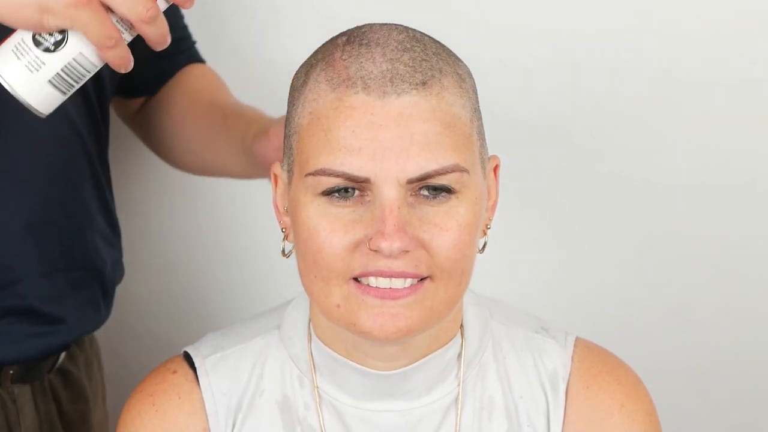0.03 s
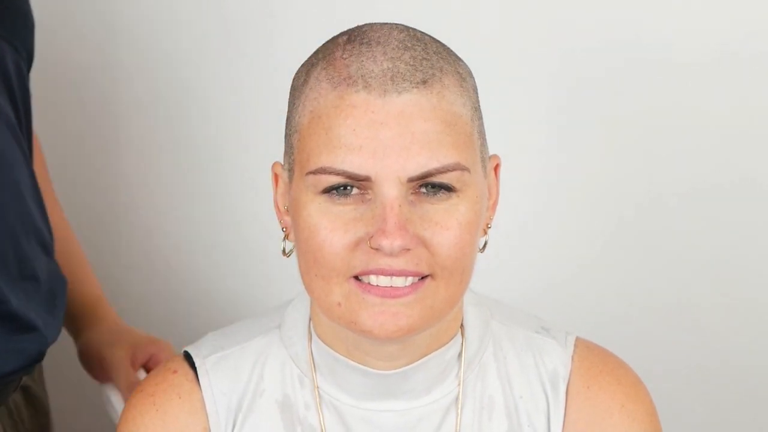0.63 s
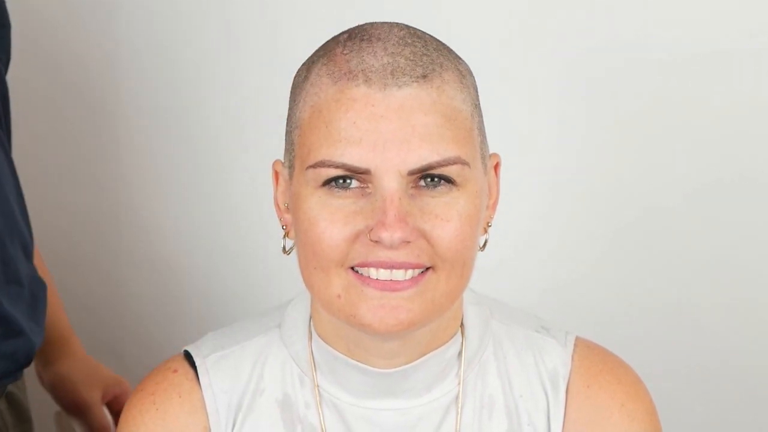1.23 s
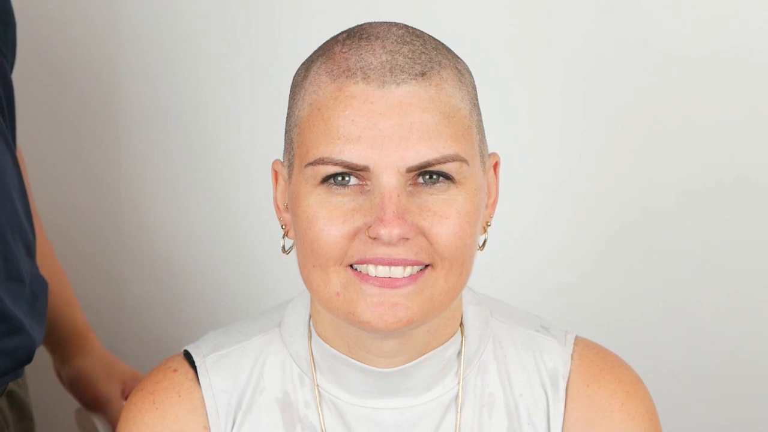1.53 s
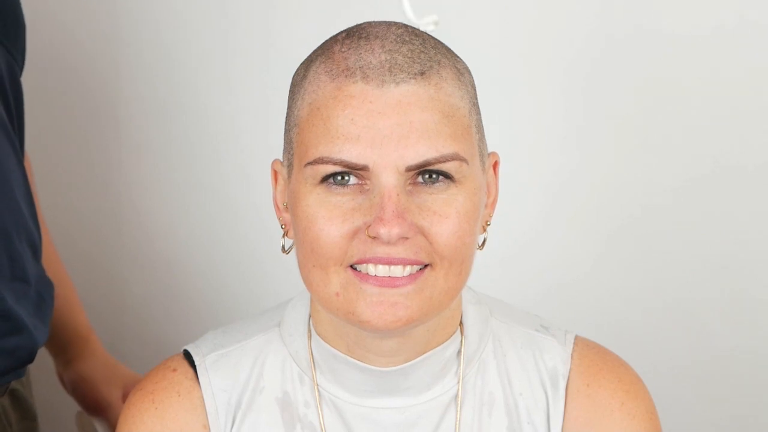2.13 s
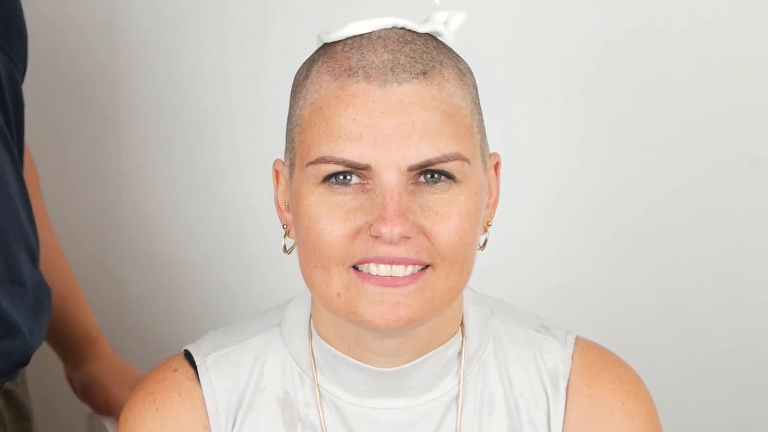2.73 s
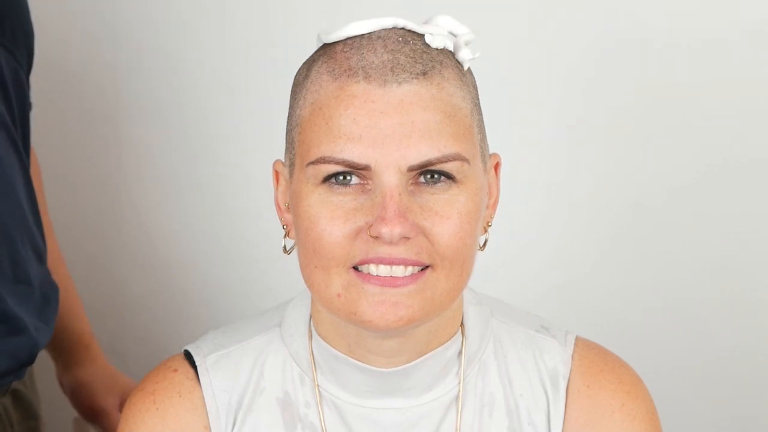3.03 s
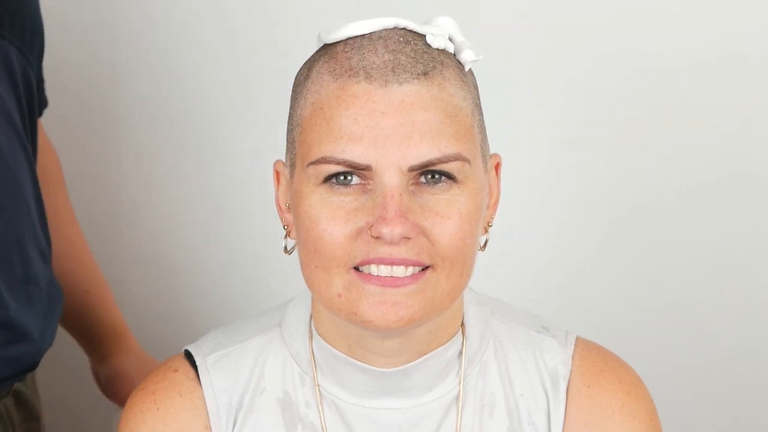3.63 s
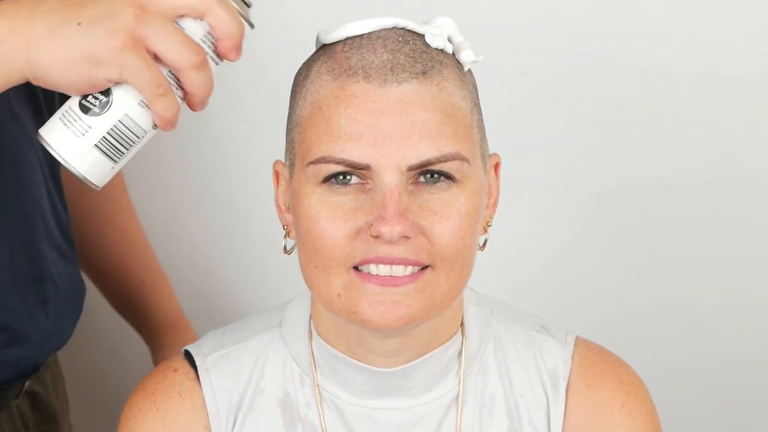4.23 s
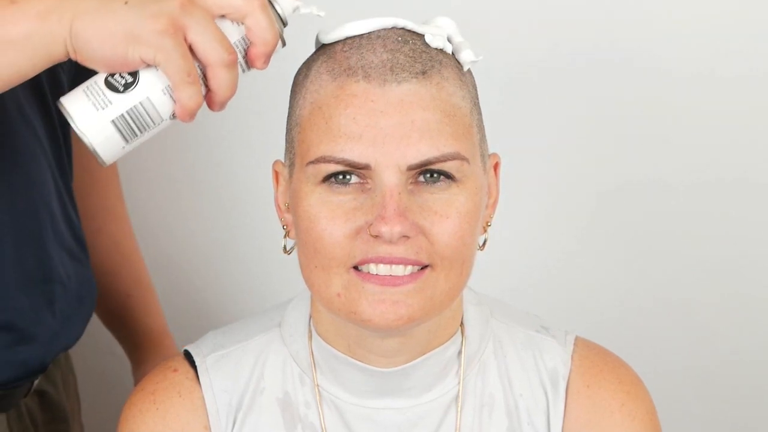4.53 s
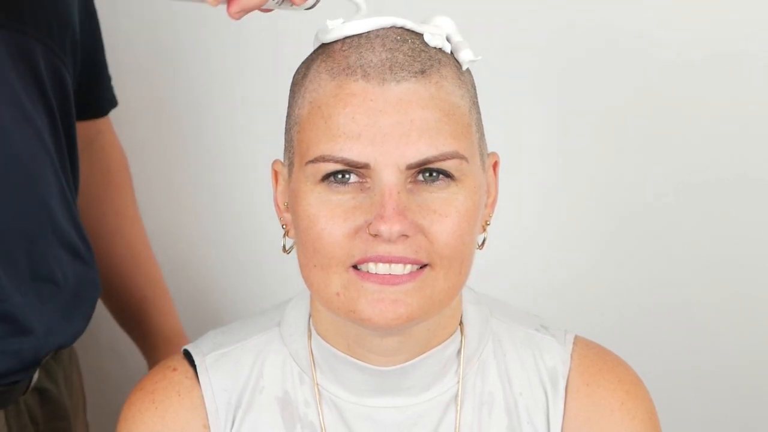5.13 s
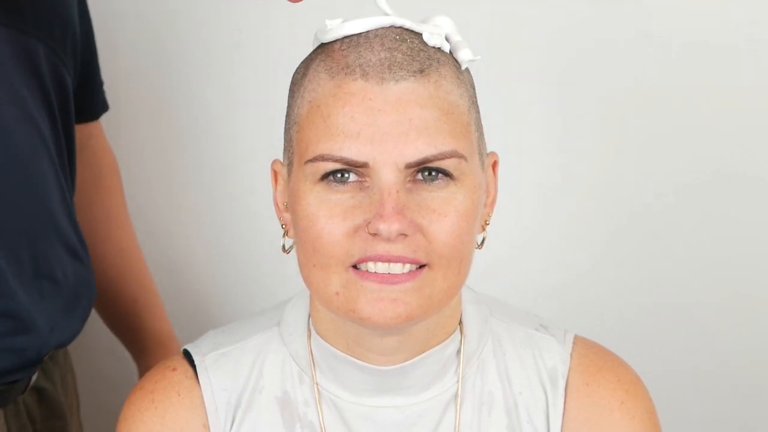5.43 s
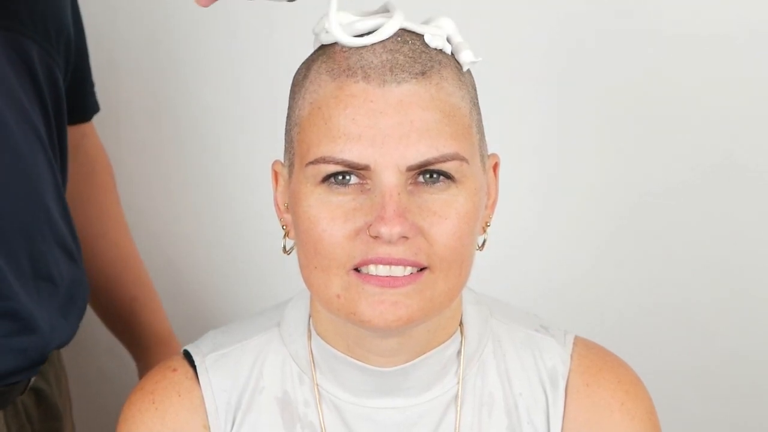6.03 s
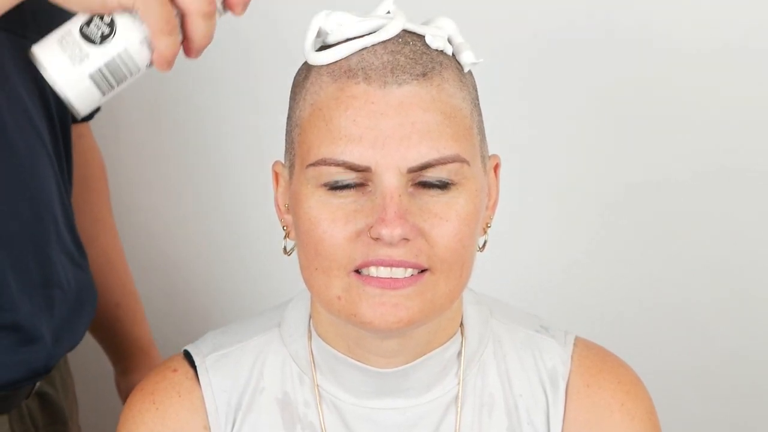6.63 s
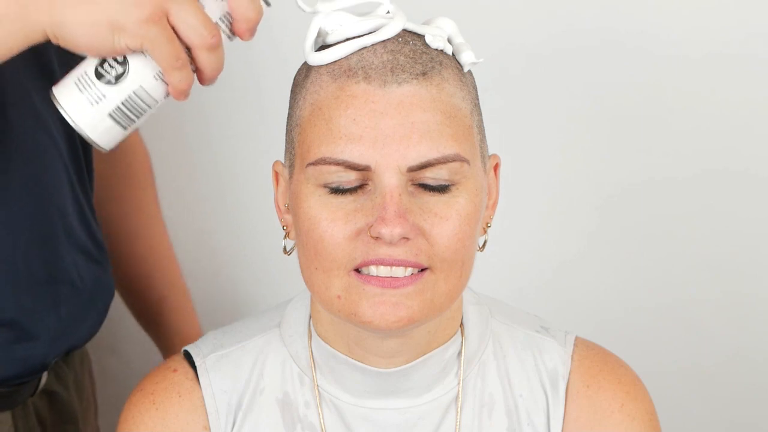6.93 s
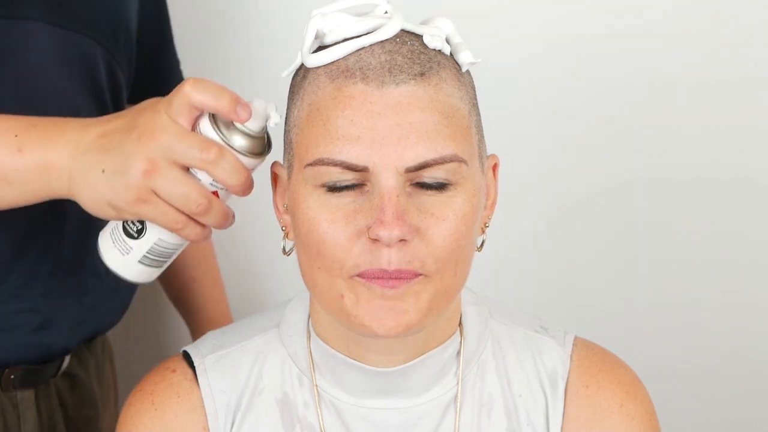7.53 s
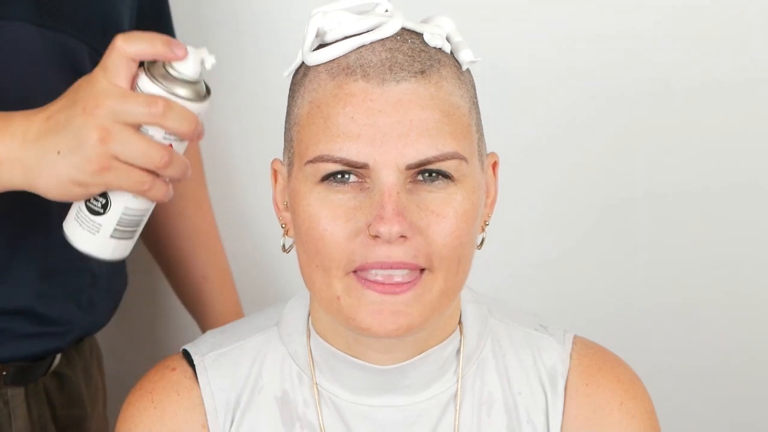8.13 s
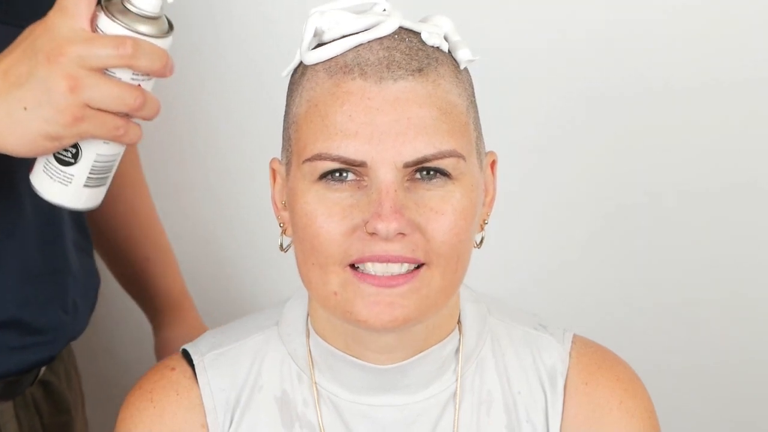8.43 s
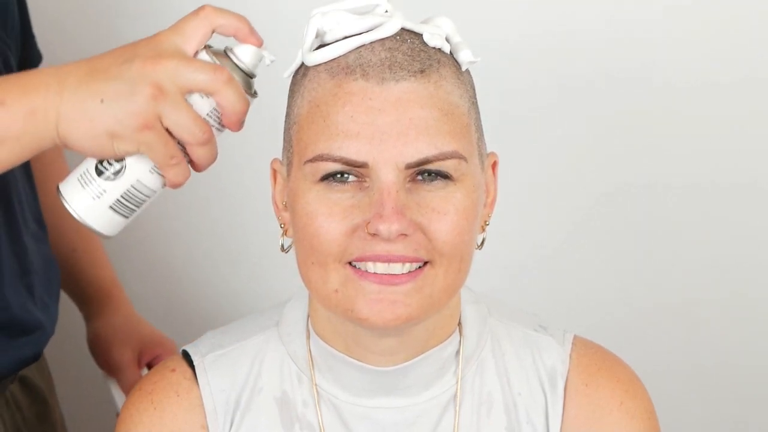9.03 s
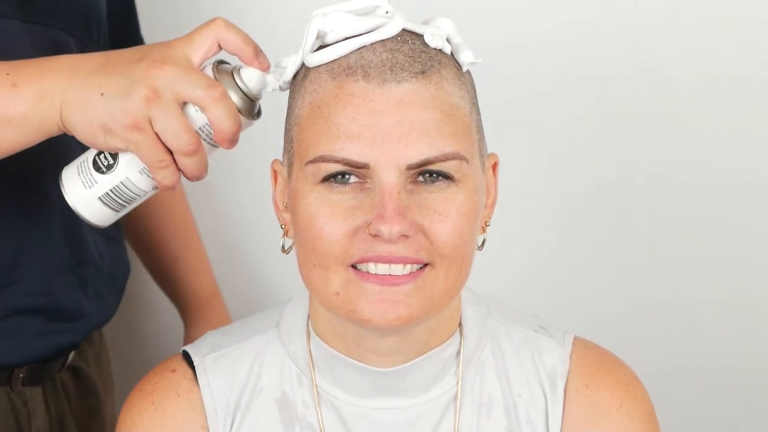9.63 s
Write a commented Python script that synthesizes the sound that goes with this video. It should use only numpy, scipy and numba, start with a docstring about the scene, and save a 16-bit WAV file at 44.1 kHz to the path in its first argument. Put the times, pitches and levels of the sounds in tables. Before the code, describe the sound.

An aerosol can squirts shaving foam three times close by, hissing and crackling with wet spurts in a quiet room.

```python
"""An aerosol can squirts shaving foam three times, close by in a small quiet room.
Gas hisses through the nozzle, gas pockets crackle and pop in the foam, and the first two presses
end in a loud wet spurt. Between presses a hand rubs the can, fingers tick on the cap and damp skin
squeaks once. A faint tone and a low hum come and go over the room's rumble."""
import sys
import numpy as np
from scipy import signal
from scipy.fft import rfft, irfft
from scipy.io import wavfile
from scipy.ndimage import uniform_filter1d
from numba import njit

SR = 44100
rng = np.random.default_rng(int(sys.argv[2]) if len(sys.argv) > 2 else 0)


def to_wav(sig):
    """Store sig (one row per channel, or 1-D mono) as 16-bit WAV at the path in sys.argv[1].

    Samples outside -1..1 are clipped; the rate is SR.
    """
    pcm = np.clip(np.atleast_2d(sig), -1, 1) * 32767
    pcm = np.round(pcm).astype(np.int16)
    wavfile.write(sys.argv[1], SR, pcm.T)  # frames by channels


N = 435708
TIME = np.arange(N) / SR


def undb(db):
    """Turn decibels into a number to multiply by."""
    return np.exp(np.asarray(db) * np.log(10) / 20)


def unit(x):
    """Scale a sound to an average (rms) level of 1."""
    return x / np.sqrt(np.mean(x ** 2) + 1e-20)


def steady(x):
    """Even out a sound so that its level stays near 1 over every 40 ms."""
    return x / np.sqrt(np.abs(uniform_filter1d(x ** 2, size=1800)) + 1e-12)


def drift(rate):
    """A smooth random wiggle of size about 1 that changes course `rate` times a second."""
    step = max(int(SR / rate), 1)
    stairs = np.repeat(rng.standard_normal(N // step + 1), step)
    return unit(uniform_filter1d(stairs, step)[:N])


def envelope(s, hold_s, rise_s, fade_s):
    """Samples and gains of a sound that is full from s for hold_s; rise and fade each cover 60 dB."""
    span = slice(max(int((s - rise_s) * SR), 0), int((s + hold_s + fade_s) * SR))
    away = np.maximum((s - TIME[span]) / rise_s, (TIME[span] - s - hold_s) / fade_s)
    return span, undb(-60 * np.maximum(away, 0))


def curves(table):
    """Join the points of each dB column into a gain over time, silent outside the table."""
    s, *columns = np.transpose(table)
    span = slice(max(int(s[0] * SR), 0), int(s[-1] * SR))
    gains = np.zeros((len(columns), N))
    gains[:, span] = undb([np.interp(TIME[span], s, column) for column in columns])
    gains[0] = uniform_filter1d(gains[0], size=90)  # no click at the ends
    return gains


def add(out, s, sound):
    """Mix a short sound in at s seconds."""
    i = max(int(s * SR), 0)
    out[i:i + len(sound)] += sound[:N - i]


def colour(x, points, size=2048):
    """Shape bass and treble to follow (f/Hz, level/dB) points."""
    hz, db = np.transpose(points)
    grid = np.maximum(np.fft.rfftfreq(size, 1 / SR), 1)
    gains = undb(np.interp(np.log(grid), np.log(hz), db))
    # folding the cepstrum makes the filter ring only after a sound, never before
    cepstrum = irfft(np.log(gains))
    cepstrum[1:size // 2] *= 2
    cepstrum[size // 2 + 1:] = 0
    response = irfft(np.exp(rfft(cepstrum)))
    return signal.oaconvolve(np.float32(x), np.float32(response))[:len(x)].astype(float)


def band(x, hz, octaves, order=2):
    """Keep only the pitches around hz."""
    edges = np.clip(hz * 2 ** (np.array([-.5, .5]) * octaves), [10, 20], [SR * .4, SR * .47])
    return signal.sosfilt(signal.butter(order, edges, "band", fs=SR, output="sos"), x + 1e-18)


@njit
def resonance(x, hz, width):
    """Ring like a hollow space whose pitch can move; width is a share of that pitch."""
    out, band_state, low_state = np.empty(len(x)), 0., 0.
    for i in range(len(x)):
        g = np.tan(np.pi * hz[i] / SR)
        ring = (band_state + g * (x[i] - low_state)) / (1 + g * (g + width))
        band_state = 2 * ring - band_state
        low_state += 2 * g * ring
        out[i] = width * ring
    return out


# the room's background noise: f/Hz, level/dB
RUMBLE_COLOUR = [(15, -91), (25, -58), (59, -32), (77, -20), (144, -7.5), (253, -4), (421, -6), (457, -6.5),
                 (552, -9), (826, -12), (1200, -15), (1300, -15.5), (4150, -24.5), (6550, -28),
                 (15500, -30)]
# its stereo width, as side level against middle level: f/Hz, level/dB
RUMBLE_WIDTH = [(50, -11), (130, -3.5), (300, -2.5), (1000, -3), (4000, -1.5), (12000, -0.5)]

def room_rumble(db=-64.5):
    """The room's steady rumble and faint hiss."""
    mid, side = (unit(colour(rng.standard_normal(N), RUMBLE_COLOUR, size=8192)) for _ in range(2))
    side = colour(side, RUMBLE_WIDTH)
    return undb(db + 0.14 * drift(5.3)) * np.array([mid + side, mid - side])


# strokes of hand and sleeve: middle t/s, half length/s, level/dB, f/Hz, width/octaves
HAND_STROKES = [(0.028, 0.036, -61.5, 3360, 1.7), (.35, 0.27, -67.5, 5000, 4.9),
                (1.297, 0.31, -72.5, 1600, 0.9), (3.933, 0.075, -50, 5200, 2.3),
                (3.947, 0.047, -49, 600, 1.6), (4.186, 0.038, -58, 600, 1),
                (4.179, 0.097, -64.5, 3400, 1.3), (7.521, 0.056, -58, 8000, 8.6),
                (7.909, 0.079, -64, 4900, 2.1), (8.208, 0.11, -73, 12350, 0.42),
                (8.203, .1, -68.5, 2190, 1.8), (8.459, 0.023, -61, 12500, 0.78),
                (8.534, 0.057, -56, 5350, 1.03), (8.866, 0.076, -59, 3860, 2.8)]

def rubs():
    """Skin and cloth slide over the can in short grainy strokes."""
    out = np.zeros(N)
    grain = rng.standard_normal(N) * undb(2.7 * drift(300))
    for s, half_s, db, hz, octaves in HAND_STROKES:
        swell = np.hanning(int(2 * half_s * SR))
        start = max(int((s - half_s) * SR), 0)
        stroke = unit(band(grain[start:start + len(swell)], hz, octaves))
        add(out, s - half_s, undb(db) * swell * stroke)
    return out


# fingers on the plastic cap: t/s, peak level/dB, f/Hz
CAP_TICKS = [(0.03, -48, 5500), (3.905, -46, 10000), (7.507, -32, 10000), (7.907, -44, 6000),
             (8.45, -42.5, 13500), (8.472, -46, 5500), (8.514, -38.5, 6000), (9.149, -44, 4200)]

def ticks(ring_s=0.00034):
    """A fingertip catches on the cap and lets go with one tiny snap."""
    out, t = np.zeros(N), TIME[:600]
    for s, db, hz in CAP_TICKS:
        snap = band(rng.standard_normal(len(t)) * np.exp(-t / ring_s), hz, octaves=1.5)
        add(out, s, undb(db) * snap / np.abs(snap).max())
    return out


# swells of the faint tone: t/s, hold/s, level/dB
TONE_SWELLS = [(1.138, .015, -54), (1.296, 0.056, -57.5), (1.465, .02, -65)]

def faint_tone(hz=467):
    """A faint, slightly rough tone swells three times before the first press."""
    pitch = hz * (1 + 0.018 * drift(39.8))
    tone = np.sin(2 * np.pi * np.cumsum(pitch) / SR) * undb(1.8 * drift(90))
    tone += undb(-8.5) * unit(band(rng.standard_normal(N), hz, octaves=0.23, order=1))
    out = np.zeros(N)
    for s, hold_s, db in TONE_SWELLS:
        span, swell = envelope(s, hold_s, rise_s=0.081, fade_s=0.47)
        out[span] += undb(db) * swell * tone[span]
    return out


def jet(points, chop_db, flicker_db):
    """Gas swirls in the nozzle, chopped finely by passing foam."""
    unevenness = undb(chop_db * drift(700) + flicker_db * drift(35))
    return unit(colour(rng.standard_normal(N) * unevenness, points))


def clog(x, centres_hz, drift_db):
    """Foam partly blocks the nozzle, so each ringing pitch swells and fades on its own."""
    return x + sum(band(x, hz, .16, order=1) * (undb(drift_db * drift(7)) - 1) for hz in centres_hz)


# the nozzle's high ring, its low ring, freely escaping gas and wet fizz: f/Hz, level/dB
HIGH_RING_COLOUR = [(500, -44.5), (3000, -38), (6500, -25.5), (7400, -15.5), (7900, -3.5), (9100, -6),
                    (9900, 1.5), (10800, -3), (11900, 0), (12350, -9), (13500, -18.5), (16000, -30.5)]
LOW_RING_COLOUR = [(150, -24), (650, -4), (1100, -18.5), (2000, -14), (2500, -35.5), (3050, -33),
                   (3700, -11), (3950, -6), (5100, 1), (5700, -2), (6400, -11.5), (9000, -36.5)]
GAS_COLOUR = [(300, -32.5), (1000, -14), (2800, -20.5), (4000, -8.5), (6500, -10.5), (12800, -3.5),
              (13800, -4.5), (15000, -4), (16000, -4)]
FIZZ_COLOUR = [(500, -32), (2800, -18.5), (5500, -7.5), (7000, 0.5), (8700, 3.5), (10000, -15),
               (14000, -28.5)]
# the flow, one curve a press: t/s, hiss level/dB, low ring against hiss/dB
PRESS_FLOWS = [
    [(1.62, -77, 4), (1.7, -51.5, -14), (1.78, -48, -7), (1.88, -53, -5.5), (2.07, -52.5, -20.5),
     (2.21, -47, -16.5), (2.38, -48, -13), (2.6, -43.5, -13.5), (2.815, -43, -10)],
    [(4.535, -69, 2), (4.565, -53, -4), (4.67, -53.5, 15.5), (4.73, -47.5, 6.5), (4.93, -48, 4.5),
     (4.99, -43, -8), (5.42, -38.5, -6), (5.75, -42, -7.2), (5.95, -40.5, -9), (6.28, -42, -15),
     (6.405, -41.5, -5.5)],
    [(9.125, -68, -4), (9.2, -55, -28), (9.29, -53, -6.5), (9.4, -43.5, -7), (9.5, -44, -4.5),
     (9.66, -41.8, 0), (9.74, -39.5, -6.5), (9.88, -39, -9)],
]
# the nozzle in each press: low ring f/Hz, width/share of f, gas and fizz against hiss/dB
PRESS_SOUNDS = [(4950, 0.37, -16, -18.5), (4800, .9, -9, -10.5), (4170, 0.72, -9, -10)]
# rushes of gas with little foam in it: t/s, hold/s, gas level/dB, fizz level/dB
GAS_RUSHES = [(1.692, 0.067, -51, -51), (2.567, 0.28, -82, -52.5), (4.69, 0.035, -62, -42.5),
              (4.76, .16, -46.5, -44), (6.403, 0.0085, -34.5, -56), (9.64, .02, -56, -63)]

def nozzle_hiss(whistle_hz=5060):
    """Flowing gas rings the nozzle, fizzes through foam and whistles faintly in a free rush."""
    high = undb(0.45) * jet(HIGH_RING_COLOUR, chop_db=1.53, flicker_db=0.93)
    high = clog(high, centres_hz=(8000, 9100, 10100, 11600), drift_db=1.5)
    low = jet(LOW_RING_COLOUR, chop_db=2.0, flicker_db=3.5)
    low = clog(low, centres_hz=(4300, 4900, 5500), drift_db=2)
    gas = undb(2.5) * jet(GAS_COLOUR, chop_db=2.5, flicker_db=1.6)
    fizz = undb(0.5) * jet(FIZZ_COLOUR, chop_db=1.5, flicker_db=0.5)
    whistle = undb(-6.5) * unit(band(rng.standard_normal(N), whistle_hz, octaves=.03, order=1))
    out = np.zeros(N)
    for press, (hz, width, gas_db, fizz_db) in zip(PRESS_FLOWS, PRESS_SOUNDS):
        flow, low_gain = curves(press)
        low_ring = undb(2.0) * steady(resonance(low, np.full(N, float(hz)), width))
        out += flow * (high + low_gain * low_ring + undb(gas_db) * gas + undb(fizz_db) * fizz)
    for s, hold_s, gas_db, fizz_db in GAS_RUSHES:
        span, rush = envelope(s, hold_s, rise_s=0.067, fade_s=0.26)
        out[span] += rush * (undb(gas_db) * (gas[span] + whistle[span]) + undb(fizz_db) * fizz[span])
    return out


def bubbles(points, per_s, spread_db, clump_db):
    """Foam bubbles burst in clumps, many small and a few large, each ringing at its own pitches."""
    places = np.flatnonzero(rng.random(N) < per_s / SR)
    sizes = undb(spread_db * np.minimum(rng.exponential(size=len(places)), 4))
    sizes *= undb(clump_db * drift(220)[places])
    rings = np.zeros(N)
    for hz in 200 * 2. ** np.arange(7):
        if points[0][0] / 2 <= hz <= 2 * points[-1][0]:  # only octaves these bubbles reach
            clicks = np.bincount(places, sizes * rng.standard_normal(len(places)), N)
            rings += band(clicks, hz, octaves=1, order=1)
    return steady(colour(rings, points))


def hollow_wobble(octaves=0.13, rate=45):
    """Shifting foam keeps resizing a hollow; this number multiplies its pitch."""
    return 2 ** (octaves * drift(rate))


# small and large bubbles bursting: f/Hz, level/dB
SMALL_BUBBLE_COLOUR = [(400, -55), (850, -15.5), (1200, -4), (1700, -5), (2400, -8.5), (3500, -5),
                       (5000, -14), (7000, -12), (15000, -46.5)]
LARGE_BUBBLE_COLOUR = [(60, -7.5), (180, -26), (330, -11), (480, -9.5), (670, 9), (820, 2), (1200, -6),
                       (2500, -55)]
# fits of crackling: t/s, hold/s, fade/s, level/dB, large bubbles against that/dB, hollow f/Hz
CRACKLE_FITS = [(1.745, 0.058, 0.42, -52.5, -15.5, 2100), (1.895, 0.0086, 0.41, -50, -30, 1520),
                (2.176, 0.021, 0.23, -59.5, 8, 1410), (4.618, 0.024, 0.3, -33.5, -20.5, 2370),
                (4.717, 0.15, .5, -39, -29, 1800), (4.943, 0.0069, .15, -36.5, -14, 1619),
                (5.026, .005, .2, -45.5, 3.5, 1350), (5.087, 0.044, 1.5, -53, -6, 1650),
                (9.252, 0.083, 0.46, -56, -5.5, 1480), (9.384, 0.0062, 0.051, -39.5, -3.5, 1840),
                (9.436, 0.047, 0.32, -42.5, 1, 1850), (9.501, .005, 0.047, -24, -16.5, 1830),
                (9.538, 0.016, 0.073, -23, -14.5, 1900), (9.578, 0.2, 0.8, -31.5, -5, 2010),
                (9.827, .06, .3, -31.5, -4, 1670)]

def foam_crackle():
    """Gas pockets crackle as the foam leaves the nozzle and ring the changing hollow behind them."""
    small = bubbles(SMALL_BUBBLE_COLOUR, per_s=1800, spread_db=2.5, clump_db=1.0)
    large = undb(0.5) * bubbles(LARGE_BUBBLE_COLOUR, per_s=650, spread_db=1.5, clump_db=1.0)
    out, wobble = np.zeros(N), hollow_wobble()
    for s, hold_s, fade_s, db, large_db, hz in CRACKLE_FITS:
        span, flow = envelope(s, hold_s, rise_s=0.073, fade_s=fade_s)
        crackle = undb(1.5) * steady(resonance(small[span], hz * wobble[span], width=0.54))
        out[span] += undb(db) * flow * (crackle + undb(large_db) * large[span])
    return out


# single large gas pockets bursting: t/s, peak level/dB, f/Hz, crack against the ring/dB
POCKET_BURSTS = [(1.871, -28.5, 1950, -7), (1.907, -27.5, 1820, -24), (1.972, -35, 1190, -11),
                 (2.155, -37, 694, -12), (2.187, -37.5, 630, 2), (2.831, -24, 2260, 6),
                 (2.85, -17, 1840, -6), (2.88, -6.5, 4910, -21), (2.921, -6, 3850, -9.5),
                 (2.926, -24, 1100, -5), (3.007, -20, 1580, -11), (4.622, -28, 2070, 0),
                 (4.638, -18, 2700, -31), (4.669, -22, 5300, -25), (4.71, -16.5, 4850, -12),
                 (4.79, -20, 1800, -13), (4.912, -17, 1820, -16), (4.942, -13.5, 1620, -14),
                 (5.011, -25.5, 1210, -10), (5.024, -21, 1490, -0.5), (5.03, -32.5, 550, -20),
                 (6.427, -22.5, 2970, 12), (6.442, -10, 3700, 0), (6.498, -15, 1200, -16),
                 (6.528, -33, 403, -20), (6.543, -22, 1310, -32), (9.255, -39, 1480, -20),
                 (9.357, -28, 1853, -9), (9.381, -23.5, 1890, -2.5), (9.439, -19, 2200, -20),
                 (9.473, -19, 1900, -16), (9.498, -6.5, 2120, -5.5), (9.524, -19, 1540, -27),
                 (9.538, -8, 2030, -11), (9.553, -8, 2160, -12), (9.598, -12.5, 1810, -5.5),
                 (9.639, -10, 2760, -21), (9.648, -15, 3700, -18), (9.726, -12, 2370, -24),
                 (9.859, -14.5, 1340, -26)]

def pops(ring_cycles=2.8, shred_s=.011, crack_s=0.0047, ragged_db=4):
    """A pocket snaps, tears and shreds; the bigger it is, the longer and purer its hollow ring."""
    out, t = np.zeros(N), TIME[:2400]
    for s, db, hz, crack_db in POCKET_BURSTS:
        tear = unit(rng.standard_normal(len(t)) * undb(ragged_db * rng.standard_normal(len(t))))
        tear *= 1 - np.exp(-t / .0005)
        tear[SR // 1000] += undb(9) * np.sqrt(SR / hz)  # the snap, 1 ms in
        tightness = min(hz / 1800, 1)  # big slack bubbles hardly crack
        fade = np.exp(-t * hz / ring_cycles) + undb(-16) * np.exp(-t / shred_s)
        ring = unit(band(tear * fade, hz, octaves=1.2 * np.sqrt(tightness)))
        crack = unit(band(tear * np.exp(-t / crack_s), hz=7000, octaves=0.67, order=3))
        pop = ring + tightness * undb(crack_db - 1) * crack
        add(out, s, undb(db) * pop / np.abs(ring).max())
    return out


# a spurt's rasp, low gurgle and fine spray: f/Hz, level/dB
RASP_COLOUR = [(200, -35.5), (600, -16.5), (1020, 1), (1350, -3), (1800, -3), (2500, -6), (3600, -5),
               (4300, -8.5), (5300, -6.5), (6500, -11), (8000, -20.5), (12000, -32.5)]
GURGLE_COLOUR = [(60, -31.5), (170, -27), (260, -18), (340, -9), (480, -5), (700, 3), (1000, -11),
                 (1500, -24.5)]
SPRAY_COLOUR = [(4000, -22), (6500, -13.5), (7500, -9.5), (9500, 1.5), (11500, -4.5), (13000, -10.5),
                (16000, -14)]
# gulps of gas: t/s, rise/s, hold/s, level/dB, spray and gurgle against that/dB, hollow f/Hz
GAS_GULPS = [(2.825, 0.011, 0.028, -19, -5.5, -11, 1990), (2.924, 0.17, 0.015, -24.5, -3, -12.5, 4160),
             (2.992, 0.18, 0.044, -24.5, -4, -19, 1840), (6.416, .008, .036, -22.5, -8.5, -9, 3350),
             (6.484, .08, 0.015, -27, -2, -12.5, 3250), (6.522, 0.042, 0.026, -42, -10, 2, 1300),
             (9.497, .012, 0.0028, -33.5, 2, -21, 2100)]

def spurts():
    """Gas tears through the foam in gulps: a throaty rasp, a gurgle below and fine spray on top."""
    rasp = bubbles(RASP_COLOUR, per_s=5500, spread_db=1.5, clump_db=1.5)
    gurgle = undb(-3.5) * bubbles(GURGLE_COLOUR, per_s=690, spread_db=4, clump_db=4.0)
    spray = undb(-1.7) * bubbles(SPRAY_COLOUR, per_s=23000, spread_db=0.0, clump_db=1.5)
    out, wobble = np.zeros(N), hollow_wobble()
    for s, rise_s, hold_s, db, spray_db, gurgle_db, hz in GAS_GULPS:
        span, flow = envelope(s, hold_s, rise_s, fade_s=0.18)
        hollow = undb(2.0) * resonance(rasp[span], hz * wobble[span], width=.3)
        throat = undb(-1.44) * steady(rasp[span] + hollow)
        gulp = throat + undb(spray_db) * spray[span] + undb(gurgle_db) * gurgle[span]
        out[span] += undb(db) * flow * gulp
    return out


# the wet squeak: f/Hz, level/dB
SQUEAK_COLOUR = [(900, -17.5), (1700, 2), (2600, 1.5), (3500, 0), (5000, -5), (9000, -39.5)]

def squeak(s=7.482, db=-49.5, end_hz=848, drop_hz=228, settle_s=.012, jitter=0.06):
    """Damp skin sticks and slips, more slowly as the grip tightens."""
    span, grip = envelope(s, hold_s=.025, rise_s=.08, fade_s=.07)
    slack = (1 - np.tanh((TIME[span] - s) / settle_s + 2)) / 2  # falls from 1 to 0
    slip_hz = (end_hz + drop_hz * slack) * (1 + jitter * drift(600)[span])
    slips = np.diff(np.floor(np.cumsum(slip_hz) / SR), prepend=0)  # one click a slip
    voice = unit(colour(band(slips, hz=3400, octaves=5.0), SQUEAK_COLOUR))
    out = np.zeros(N)
    out[span] = undb(db) * grip * voice
    return out


def low_hum(hz=154, hum_db=-70.5, murmur_db=-62):
    """An unsteady low hum holds for a while, and a soft murmur above it swells once."""
    pitch = hz * (1 + 0.024 * drift(15))
    hum = np.sin(2 * np.pi * np.cumsum(pitch) / SR) * undb(3.2 * drift(9))
    murmur = unit(band(rng.standard_normal(N), hz=291, octaves=0.44))
    out = np.zeros(N)
    span, swell = envelope(s=7.88, hold_s=1.45, rise_s=.3, fade_s=1.0)
    out[span] += undb(hum_db) * swell * hum[span]
    span, swell = envelope(s=8.95, hold_s=0.11, rise_s=3.8, fade_s=2)
    out[span] += undb(murmur_db) * swell * murmur[span]
    return out


def echoes(fade_s, gap_s, size=12000):
    """Many tiny echoes that start after a gap and die away by 60 dB in fade_s."""
    t = TIME[:size]
    response = rng.standard_normal(size) * undb(-60 * t / fade_s) * (t > gap_s)
    return response / np.sqrt(np.sum(response ** 2))


def scatter(x, fade_s, gap_s):
    """Echoes that change every quarter second, because the can keeps moving."""
    hop = SR // 4
    padded, window = np.pad(x, (hop, 2 * hop)), np.sqrt(np.hanning(2 * hop))
    out = np.zeros(len(padded) + SR)
    for i in range(0, N + hop, hop):
        piece = signal.fftconvolve(padded[i:i + 2 * hop] * window, echoes(fade_s, gap_s, size=4000))
        out[i:i + len(piece)] += piece
    return out[hop:hop + N]


# the can's stereo width, as side level against the direct sound: f/Hz, level/dB
CAN_WIDTH = [(200, -11), (1500, -11), (4500, -9.5), (7500, -5), (10000, -6), (12500, 1.5), (15000, -1)]

def room(x, early_db=-9, wall_db=-16):
    """Head and shoulders scatter the treble differently to each side; near walls add a short ring."""
    mid = x + undb(early_db) * scatter(x, fade_s=0.07, gap_s=0.0029)
    side = colour(scatter(x, fade_s=.06, gap_s=0.00034), CAN_WIDTH)
    walls = np.array([signal.oaconvolve(x, echoes(fade_s=0.14, gap_s=0.0083))[:N] for _ in range(2)])
    return np.array([mid + side, mid - side]) + undb(wall_db) * walls


def scene():
    """The can in its room, a touch to the right, over the background."""
    can = rubs() + ticks() + nozzle_hiss() + foam_crackle() + pops() + spurts() + squeak()
    # the can's sound keeps next to nothing below about 110 Hz
    can = signal.sosfilt(signal.butter(2, 110, "high", fs=SR, output="sos"), can + 1e-18)
    left_right = undb([[-1.8], [-1.2]])
    return left_right * room(can) + room_rumble() + faint_tone() + low_hum()


def record(dry, top_hz=15800):
    """Cut away the very highest treble."""
    return signal.sosfilt(signal.ellip(10, .2, 70, top_hz, fs=SR, output="sos"), dry)


dry = scene()
out = record(dry)
to_wav(out)
```